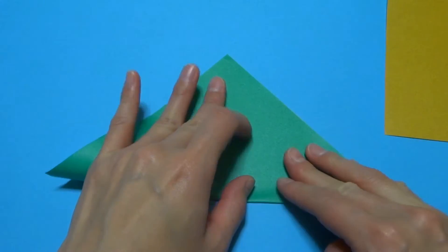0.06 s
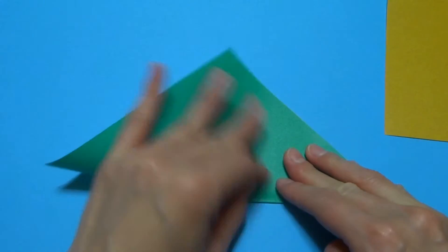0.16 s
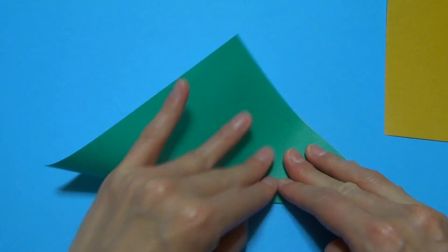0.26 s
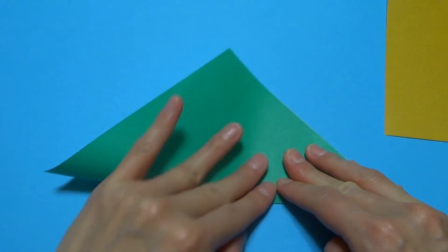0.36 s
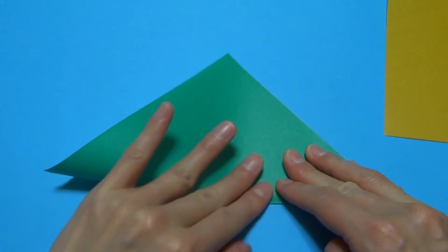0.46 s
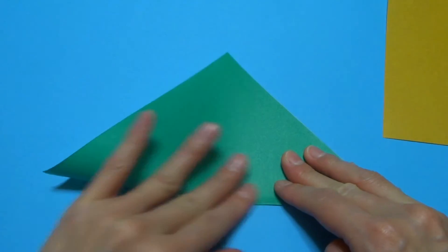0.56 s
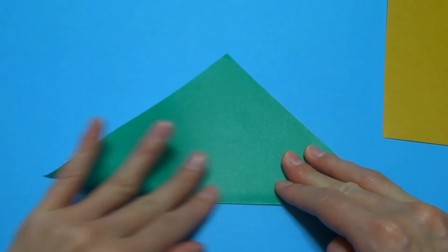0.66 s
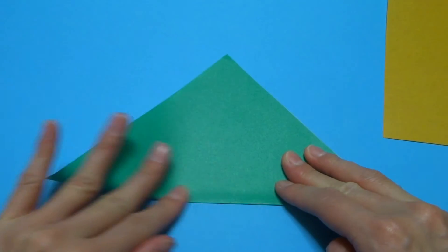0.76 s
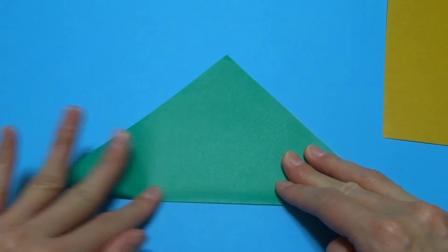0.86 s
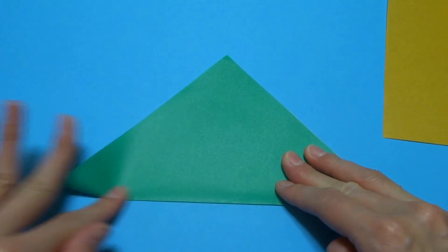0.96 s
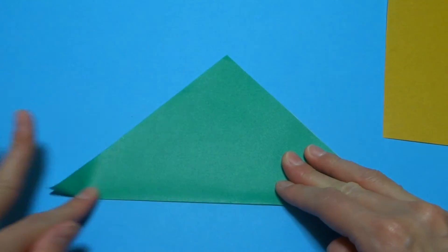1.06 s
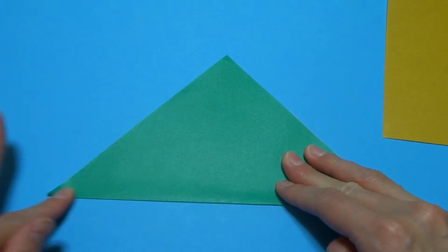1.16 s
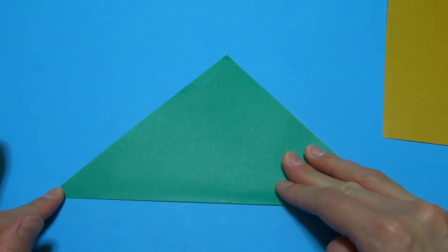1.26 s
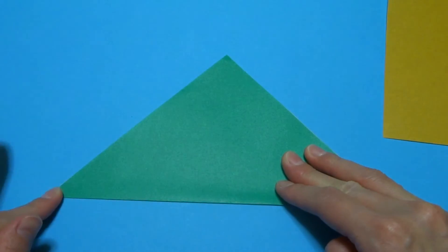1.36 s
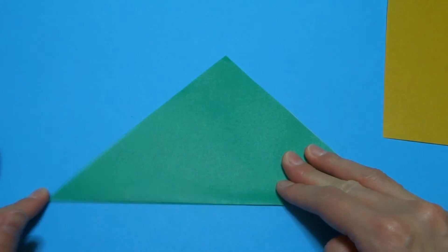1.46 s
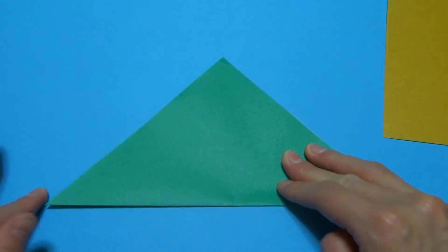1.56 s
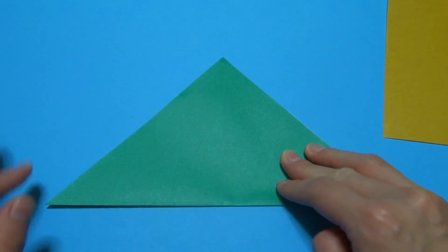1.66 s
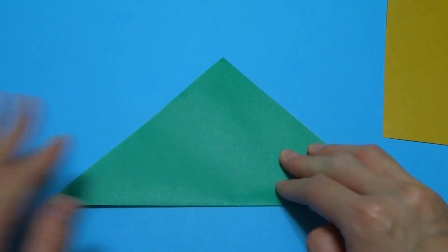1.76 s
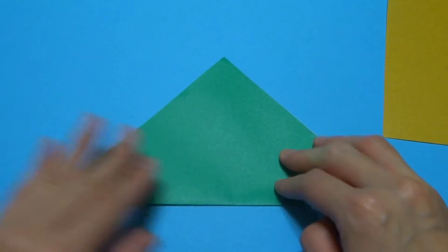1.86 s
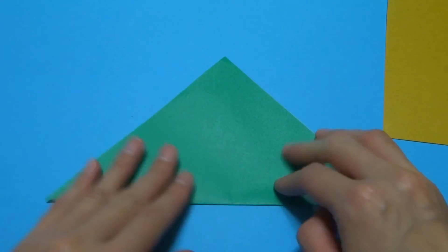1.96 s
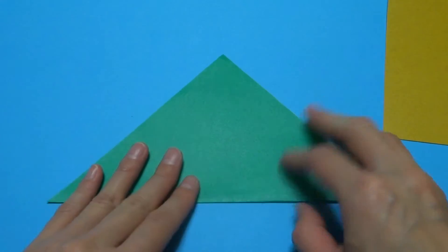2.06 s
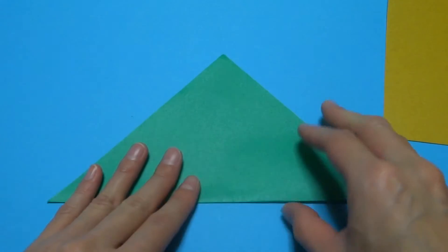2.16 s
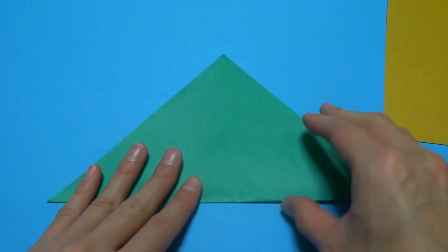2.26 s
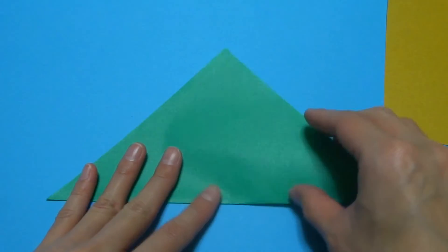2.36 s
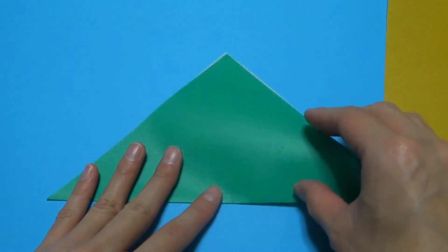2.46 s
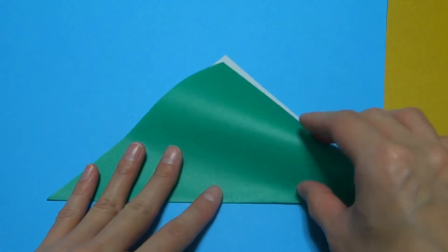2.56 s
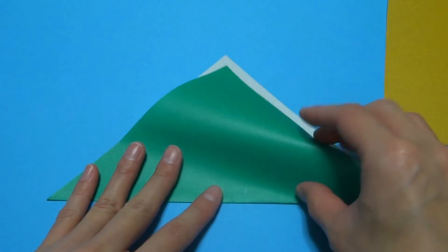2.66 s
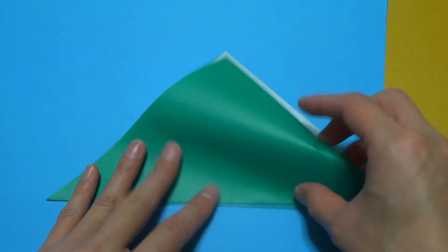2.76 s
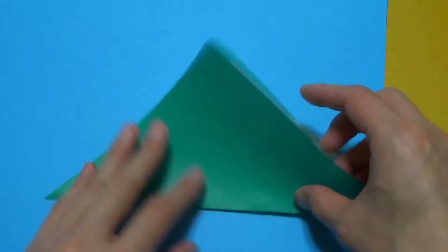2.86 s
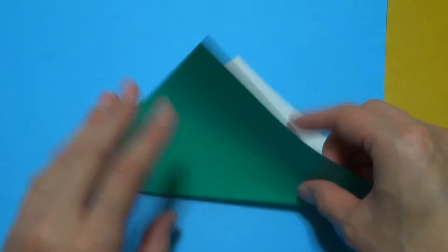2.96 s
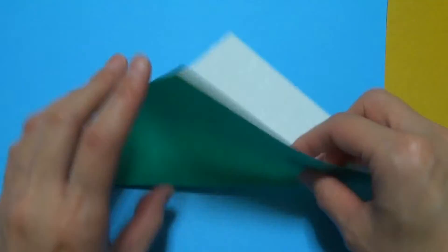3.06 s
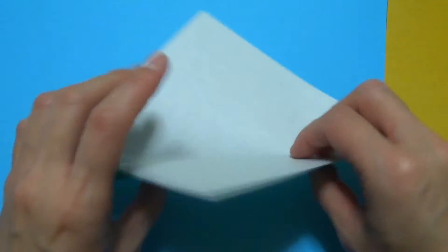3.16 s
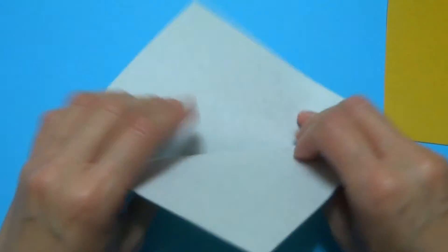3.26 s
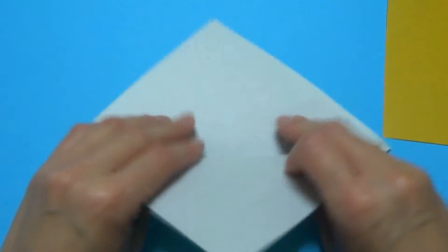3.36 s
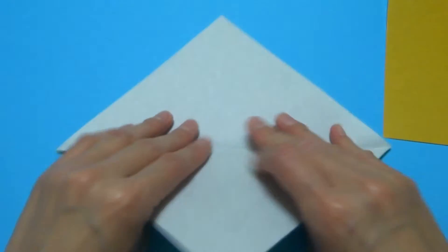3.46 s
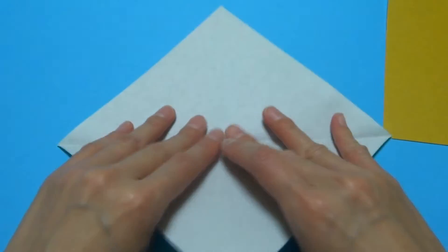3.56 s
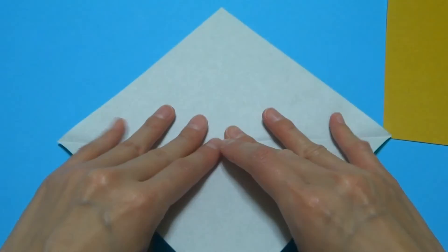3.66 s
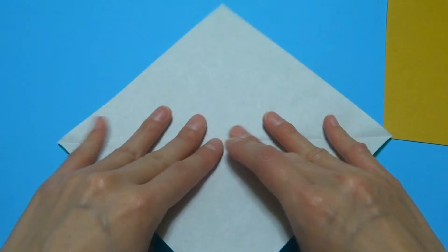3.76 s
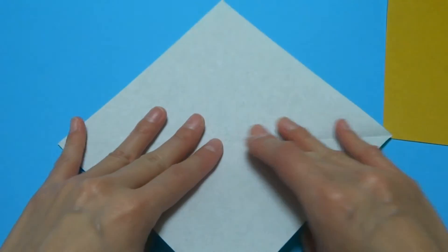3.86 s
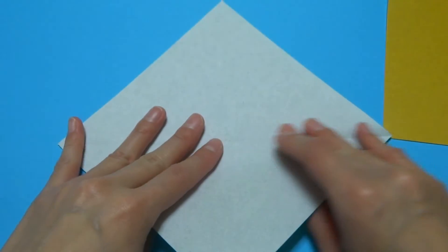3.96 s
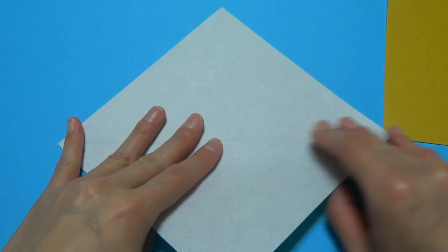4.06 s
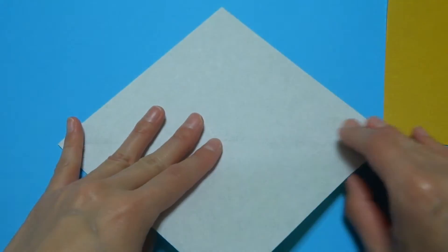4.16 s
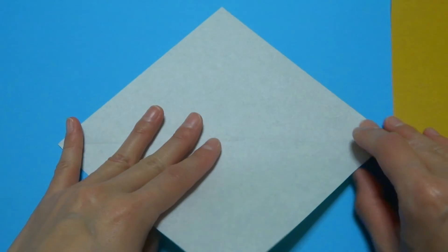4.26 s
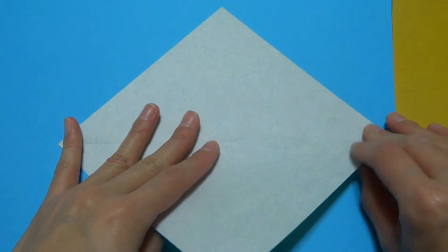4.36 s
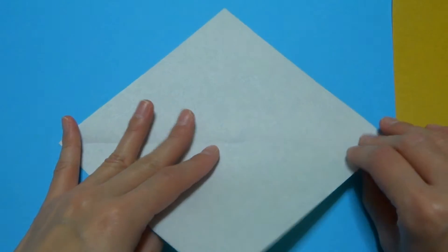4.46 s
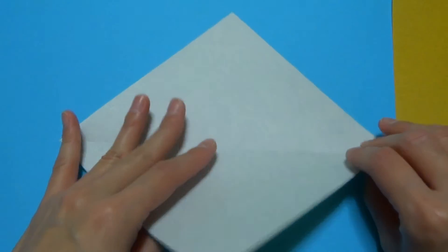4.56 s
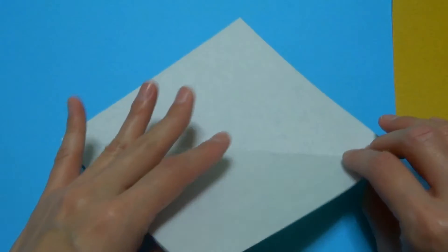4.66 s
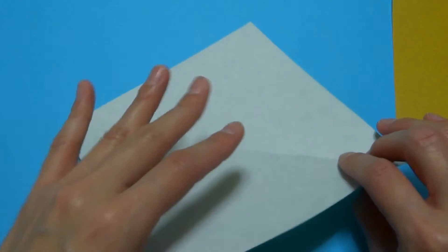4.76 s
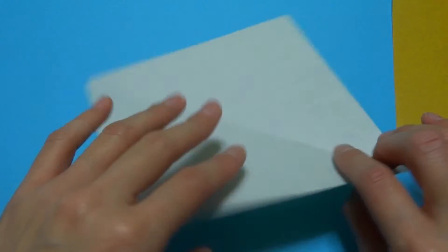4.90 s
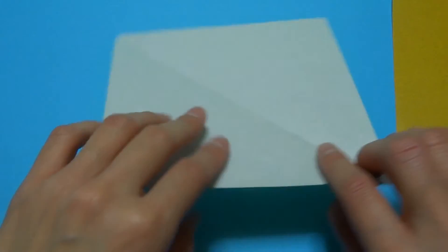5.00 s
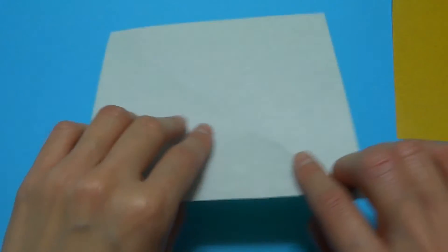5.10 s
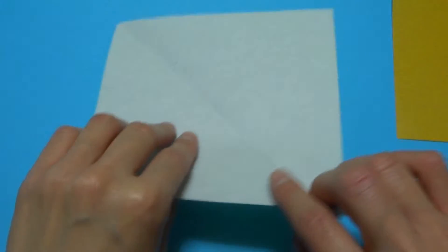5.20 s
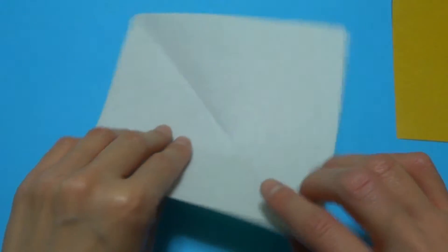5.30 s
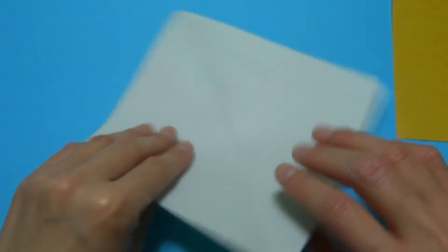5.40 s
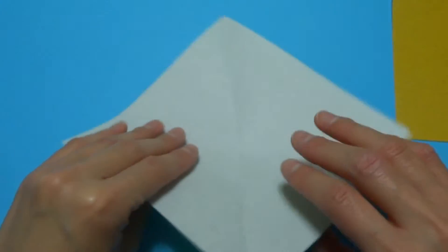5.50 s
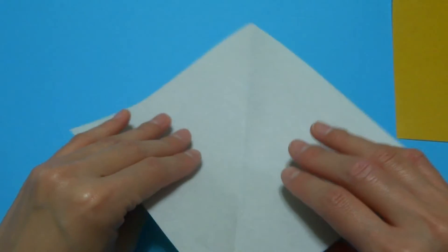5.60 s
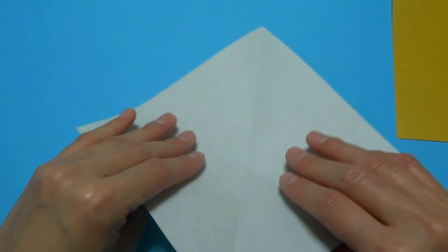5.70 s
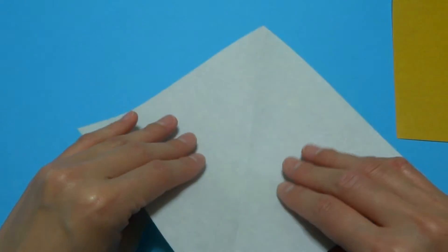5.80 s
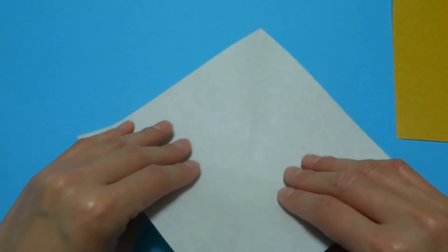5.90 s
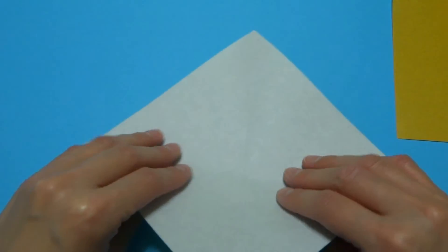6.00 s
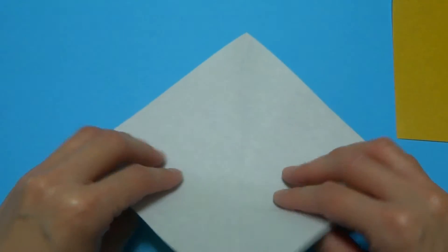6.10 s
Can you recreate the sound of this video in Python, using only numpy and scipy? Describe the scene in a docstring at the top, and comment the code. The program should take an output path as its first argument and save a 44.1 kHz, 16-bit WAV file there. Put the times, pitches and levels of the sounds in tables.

```python
"""A low hum and a faint whirr are there from the start, and a snap of paper comes almost at once.
A folded sheet of thin paper is smoothed, opened and turned on a table in a small room.
Rubbing and hissing are made of thousands of tiny random clicks, shaped in tone and level.
Each snap is a sharp kick with a short flutter of noise; the hands bump the table now and then.
Soft swells of low noise are the air pushed out as the sheet falls."""
import sys
import numpy as np
from scipy import signal
from scipy.fft import rfft, irfft, next_fast_len
from scipy.io import wavfile
from scipy.ndimage import uniform_filter1d, map_coordinates

SR = 44100
rng = np.random.default_rng(int(sys.argv[2]) if len(sys.argv) > 2 else 0)


def store_wav(level_fs):
    """Save 16-bit WAV to argv[1]."""
    pcm = np.round(np.clip(np.atleast_2d(level_fs), -1, 1) * 32767)
    wavfile.write(sys.argv[1], SR, pcm.T.astype(np.int16))


N = 270774  # length of the scene in samples

# tone of the rumble and whirr: pitch_hz, level_db (per Hz)
AMBIENCE_TONE = [(20, 0), (105, -5), (200, -10), (400, -16.5), (700, -20), (920, -14.5), (1030, -7.5),
                 (1190, -7), (1320, -11.5), (1510, -5.5), (1760, -13), (1980, -24), (3500, -30),
                 (11000, -32.5)]
# how alike left and right are in the rumble and whirr: pitch_hz, likeness (1 same, -1 opposite)
AMBIENCE_LIKENESS = [(50, 0.99), (105, 0.71), (190, 0.3), (350, -0.32), (630, -0.56), (1130, -0.49),
                     (2000, 0.055), (4500, 0.063), (9000, 0.57)]
# how alike left and right are in the paper sounds: pitch_hz, likeness (1 same, -1 opposite)
PAPER_LIKENESS = [(200, 0.99), (1000, 0.57), (4000, 0.91), (10000, 0.96)]
# how long the room takes to fade by 60 dB: pitch_hz, fade_s
ROOM_FADE = [(200, 0.51), (1200, 0.13), (5000, 0.11), (11000, 0.07)]
# early echoes from near walls, before a random change of delay: delay_s, level_db
WALL_ECHOES = [(.0032, -11.5), (0.011, -18), (0.0167, -19), (0.018, -27), (0.023, -19)]
# soft blows on the table: start_s, peak_db (before a small random change), contacts, gap_s
TABLE_BUMPS = [(0.308, -38, 3, 0.00393), (1.376, -34, 5, .009), (3.656, -36, 2, 0.015)]
# tone of the table when struck: pitch_hz, level_db (per Hz)
TABLE_TONE = [(40, -41), (85, 5), (125, -3), (190, -0.5), (290, -14.5), (500, -13), (660, -23.5), (930, -6),
              (1100, -17.5), (1500, -23.5), (3000, -33.5), (8000, -45)]
# the sheet falls and pushes air out from under it: middle_s, level_db, half_length_s
AIR_PUFFS = [(3.433, -53, 0.041), (3.54, -48.5, 0.055), (5.603, -47.5, 0.052)]
# tone of that air: pitch_hz, level_db (per Hz)
PUFF_TONE = [(25, -20), (55, -8), (75, 1), (110, -18), (300, -53), (900, -90)]
# brushes, short or drawn out, that catch one resonance of the sheet:
# middle_s, half_length_s, pitch_hz, level_db
PAPER_BRUSHES = [(0.227, 0.05, 6100, -48.5), (0.759, 0.17, 2900, -55.5), (0.97, 0.035, 4570, -47),
                 (3.367, 0.0085, 1130, -40), (3.502, 0.022, 1370, -36.5), (3.505, .03, 4740, -36.5),
                 (4.075, 0.29, 4030, -59), (4.25, 0.022, 7240, -45), (5.398, 0.13, 9900, -43),
                 (6.11, 0.066, 4800, -47.5)]
# the whole sheet bends while it is opened: middle_s, level_db, half_length_s
SHEET_BENDS = [(3.0, -48.5, 0.12), (3.275, -43, 0.044), (3.4, -51.5, 0.12), (3.505, -45, 0.031),
               (3.615, -37, 0.016)]
# tone of the bending: pitch_hz, level_db (per Hz)
BEND_TONE = [(60, -11), (160, -13.5), (300, -13.5), (680, -11.5), (950, -3), (1250, 1), (1700, -12.5),
             (2300, -13.5), (5000, -27)]
# tone of the small pops: pitch_hz, level_db (per Hz)
CRACKLE_TONE = [(600, -15), (1100, -6), (2500, -14), (4500, 4), (7500, 28), (11000, -24)]
# how unevenly the paper sticks and slips: time_s, depth_db
GRIP_DEPTH = [(0, 5), (.5, -0.4), (2.4, 5), (2.7, 2.5), (3.7, 3), (3.9, 0.6), (4.7, 0.15), (4.98, 2.5),
              (5.3, 3)]
# tone of the mid rub: pitch_hz, level_db (per Hz)
RUB_TONE = [(200, -12.5), (650, -13), (950, 0.5), (1500, 0), (2300, -3.5), (3200, -0.5), (4400, -1.5),
            (6000, -4.5), (11000, -9)]
# tone of the treble hiss: pitch_hz, level_db (per Hz)
HISS_TONE = [(600, -30), (2000, -9.5), (4000, -6), (5500, -2), (6500, 0.5), (8000, 4), (9500, 0),
             (11000, -3.5)]
# long slides, one curve each: the left hand wipes along the fold, the hands spread over the
# open sheet, the sheet is turned in two pulls: time_s, rub_db, hiss_db
LONG_SLIDES = [
    [(0.5, -67, -69), (0.59, -50.5, -46.5), (0.676, -52, -41), (0.862, -51, -51.5), (0.958, -54, -43.5),
     (1.116, -64, -53), (1.186, -64, -69), (1.25, -77, -83)],
    [(3.76, -62, -66), (3.796, -58, -52), (3.992, -56.5, -44), (4.174, -52.5, -53.5), (4.222, -60, -63),
     (4.236, -53.5, -49.5), (4.348, -56, -70), (4.43, -58.5, -59)],
    [(4.79, -55.5, -52), (4.872, -61, -31.5), (4.9, -53, -36.5), (4.95, -58, -34), (4.964, -52, -42),
     (4.972, -56, -38.5), (5.022, -52.5, -41), (5.06, -59, -58)],
    [(5.27, -58, -61), (5.288, -53.5, -36), (5.462, -55, -34), (5.484, -55.5, -40), (5.616, -64, -34),
     (5.65, -62, -51.5), (5.7, -59, -42.5), (5.78, -62.5, -65)],
]
# short strokes of a finger or of paper on paper: start_s, length_s, rub_db, hiss_db
SHORT_STROKES = [(0.105, 0.074, -62.5, -58.5), (0.205, 0.054, -53.5, -43), (0.298, 0.06, -55, -60),
                 (1.472, .02, -63, -53), (1.868, 0.0094, -83, -67.5), (1.983, 0.021, -84, -66),
                 (2.034, 0.012, -81, -55.5), (2.31, 0.012, -84, -60), (2.593, 0.11, -55.5, -59.5),
                 (2.79, 0.019, -52.5, -43.5), (2.878, .11, -46.5, -49), (2.975, 0.01, -48, -34),
                 (3.063, 0.11, -50.5, -51), (3.258, 0.15, -48, -63), (3.405, 0.029, -43, -45),
                 (3.474, 0.043, -37.5, -44.5), (3.547, 0.065, -45.5, -63), (3.657, 0.062, -62, -53),
                 (4.476, 0.045, -62, -45.5), (4.566, 0.073, -52, -44), (4.706, .035, -54.5, -45),
                 (5.135, 0.13, -58, -49.5), (5.207, 0.018, -53, -43.5), (5.285, 0.012, -62, -41),
                 (5.853, .08, -64.5, -53), (5.982, 0.27, -52, -48.5)]
# the paper buckles: start_s, level_db, pitch_hz (of the dent), body_db (low body of the whole sheet),
# fade_s (time for the flutter to fade by 60 dB)
PAPER_SNAPS = [(0.0302, -5, 1690, -2, 0.025), (0.309, -16, 5400, 0, .011), (0.429, -17.5, 2700, 1, .014),
               (1.3733, -11.5, 2280, -2, 0.011), (2.3798, -13, 2060, 1, 0.017),
               (2.4297, -17, 7500, 0, 0.0098), (2.5581, 0, 5970, 0.5, 0.016),
               (2.8112, -11, 4400, -3, 0.023), (2.8577, 7, 7250, 1, 0.018), (2.8823, 9.5, 5150, -3, 0.022),
               (2.904, 1.5, 4000, 3, 0.011), (3.0063, -4, 5580, 3, .009), (3.0643, -3, 3580, 3, .017),
               (3.2311, 3, 6560, 1, 0.013), (3.2881, 2, 2400, -1, .018), (3.4024, 14.5, 2380, -4, .008),
               (3.43, 7.5, 3220, 5, 0.017), (3.5883, 5, 7600, -1, 0.0034), (3.601, 4.5, 3200, 3, 0.041),
               (3.64, -4, 1310, 2, 0.01), (3.6688, 3, 2200, 4, 0.0045), (3.6917, 3, 2820, -3.5, 0.012),
               (3.7158, 1.5, 1390, 2.5, 0.0059), (3.861, -11, 3760, 4, 0.018),
               (4.3193, -18, 5500, -8, .009), (4.5849, 2.5, 8900, -9, 0.003),
               (4.7572, -10, 2670, -1, 0.015), (4.87, -12, 9000, -14, 0.017),
               (4.9226, -8, 9900, -16, 0.003), (5.073, 0, 2400, 2, 0.005), (5.094, -16, 7200, 8, 0.013),
               (5.1174, -10.5, 1270, 2, .02), (5.231, -10.5, 2980, 3, 0.01), (5.707, -13.5, 4500, 2, 0.018)]
# what the sheet gives out in a snap: pitch_hz, level_db (per Hz)
SNAP_TONE = [(100, -19), (640, -18), (950, 0.5), (1450, 0), (1900, -1.5), (2400, -5), (3200, 0.5),
             (4500, 1.5), (8000, 0), (11000, -1)]

TOP_HZ = 11000  # the sound drops away steeply above this
BRUSH_Q = 5.2  # centre of a brush's resonance over its width
RISE_DB_PER_S, FALL_DB_PER_S = 336, 210  # edges of a very long stroke; shorter ones are steeper
SHORT_S = 0.027  # the edges of a stroke this short are twice as steep
DENT_PEAK_DB, DENT_OCTAVES, DENT_FALL_DB_PER_OCTAVE = 2.5, 0.21, 10  # a dent gives little above its pitch
BODY_HZ = 1860  # the whole sheet sounds below this


def amp(db):
    """Turn decibels into a gain."""
    return 10 ** (np.asarray(db) / 20)


def unit(x):
    """Scale x to an average (rms) level of 1."""
    return x / np.sqrt(np.mean(x ** 2) + 1e-20)


def along(points, hz):
    """Read a curve of (Hz, value) points, spaced by the logarithm of pitch."""
    f, v = np.transpose(points)
    return np.interp(np.log(hz + 1), np.log(f + 1), v)


def curves(rows):
    """Give one value per sample for each column after the time."""
    s, *columns = np.transpose(rows)
    t = np.arange(N) / SR
    return [np.interp(t, s, column) for column in columns]


def wobble(rate):
    """Draw a smooth random curve with this many knots a second."""
    knots = rng.standard_normal(int(N * rate / SR) + 4)
    return map_coordinates(knots, [np.arange(N) * rate / SR])


def swells(rows):
    """Sum bell-shaped swells into one gain over time."""
    t = np.arange(N) / SR
    return sum(amp(db) * np.exp(-((t - s) / half) ** 2) for s, db, half in rows)


def filtered(x, response):
    """Multiply the spectrum of x by a gain for each pitch."""
    m = next_fast_len(N + SR // 2)
    return irfft(rfft(x, m) * response(np.fft.rfftfreq(m, 1 / SR)), m)[..., :N]


def add(track, s, sound):
    """Mix a sound into the track at time s."""
    part = track[..., max(round(s * SR), 0):][..., :sound.shape[-1]]
    part += sound[..., :part.shape[-1]]


def coloured(pair, tone, likeness):
    """Turn two unrelated signals into a stereo sound of rms 1 with this tone and likeness."""
    def middle_and_side(hz):
        turn = np.arccos(np.clip(along(likeness, hz), -1, 1)) / 2
        return amp(along(tone, hz)) * np.array([np.cos(turn), np.sin(turn)])
    mid, side = filtered(pair, middle_and_side)
    return unit(np.array([mid + side, mid - side]))


def impulse(tone, size=2048):
    """Build a click with this tone whose energy comes as early as possible."""
    cepstrum = irfft(np.log(amp(along(tone, np.fft.rfftfreq(size, 1 / SR)))))
    # fold the second half onto the first, so nothing sounds before the click
    cepstrum[1:size // 2] *= 2
    cepstrum[size // 2 + 1:] = 0
    return irfft(np.exp(rfft(cepstrum)))


def slips(rate, spread_db):
    """Make tiny catches of the fibres: random clicks, about rate a second, of unequal size."""
    sizes = amp(spread_db * np.clip(rng.standard_normal(N), -2, 2))
    happens = rng.random(N) < rate / SR
    return rng.standard_normal((2, N)) * sizes * happens


def shifting(x, depth_db):
    """Let the sheet's broad resonances drift as its shape changes, by smooth random gains."""
    z = signal.stft(x, nperseg=512)[2]
    field = rng.standard_normal(z.shape[1:])
    field = uniform_filter1d(field, size=9, axis=0)  # smooth over pitch
    field = uniform_filter1d(field, size=10, axis=1)  # smooth over time
    return signal.istft(z * amp(depth_db * unit(field)), nperseg=512)[1][:, :N]


def gate(start, end):
    """Shape a stroke: it swells quickly, holds and dies away more slowly; short ones have quicker edges."""
    t = np.arange(N) / SR
    edge_db = np.minimum(RISE_DB_PER_S * (t - start), FALL_DB_PER_S * (end - t))
    steeper = 1 + SHORT_S / max(end - start, 1e-3)
    return amp(np.clip(edge_db * steeper, -120, 0))


def background():
    """Room rumble and a steady whirr from noise, with a faint whine and a wavering hum from sines."""
    t = np.arange(N) / SR

    # the whirr is partly out of step between left and right, so it spreads wider than the rumble
    def middle_and_side(hz):
        width = np.tan(np.arccos(np.clip(along(AMBIENCE_LIKENESS, hz), -.8, 1)) / 2)
        return amp(along(AMBIENCE_TONE, hz)) * np.array([np.ones_like(hz), width])
    mid, side = filtered(rng.standard_normal((2, N)), middle_and_side)
    air = amp(-54.0) * np.array([mid + side, mid - side]) / mid.std()

    waver = amp(0.5 * wobble(23))
    hum = amp(-60.0) * waver * np.sin(2 * np.pi * 105 * t + 1.4 * wobble(22))
    whine_gain = amp(-61 + 2.0 * wobble(8.4))
    whine = whine_gain * np.sin(2 * np.pi * 1215 * t + 1.8 * wobble(70))
    return air + hum + whine


def room(x, tail_db, echo_db):
    """Add echoes from near walls, redrawn at each call as places vary, and a short tail of fading noise."""
    hz, t, z = signal.stft(rng.standard_normal((2, SR // 4)), SR, nperseg=256)
    fade = amp(-60 * t / along(ROOM_FADE, hz)[:, None])
    mid, side = signal.istft(z * fade, SR, nperseg=256)[1]
    tail = np.array([mid + 0.23 * side, mid - 0.41 * side]) / np.linalg.norm(mid)
    answer = np.zeros((2, SR // 4))
    answer[:, 0] = 1  # the direct sound
    add(answer, .008, amp(tail_db) * tail)
    for delay, db in WALL_ECHOES:
        add(answer, delay * rng.uniform(.9, 1.2), amp(db + echo_db) * np.ones(1))
    return signal.fftconvolve(x[None], answer, axes=1)[:, :N]


def bumps():
    """A hand lands on the table and chatters against the top, a few dull contacts in a row."""
    track, thud = np.zeros(N), impulse(TABLE_TONE)
    thud = thud / np.abs(thud).max()
    for s, db, contacts, gap in TABLE_BUMPS:
        for k in range(round(contacts)):
            contact_s = s + gap * (k + rng.uniform(0, .12))
            add(track, contact_s, amp(db + rng.normal(0, 1)) * thud)
    return room(track, tail_db=-15, echo_db=-6)


def puffs():
    """The sheet settles on a cushion of air, heard as swells of low noise."""
    return swells(AIR_PUFFS) * coloured(rng.standard_normal((2, N)), PUFF_TONE, PAPER_LIKENESS)


def brushing():
    """A fingertip or a corner of the sheet swishes past: noise coloured by one resonance."""
    track = np.zeros(N)
    t = np.arange(-SR // 3, SR // 3) / SR
    noise_hz = np.fft.rfftfreq(len(t), 1 / SR)
    for s, half, hz, db in PAPER_BRUSHES:
        resonance = 1 / (1 + (2 * BRUSH_Q * (noise_hz / hz - 1)) ** 2)
        swish = unit(irfft(rfft(rng.standard_normal(len(t))) * resonance, len(t)))
        swish = amp(db) * swish * np.exp(-(t / half) ** 2)
        add(track, s + t[0], swish[s + t >= 0])  # leave out what falls before the start
    return track


def flexing():
    """The bending sheet gives a lower, coarser crackle of fewer clicks."""
    grain = shifting(slips(1100, 4), depth_db=3.5)
    return swells(SHEET_BENDS) * coloured(grain, BEND_TONE, PAPER_LIKENESS)


def crinkling(rub_gain, hiss_gain):
    """Many small dents pop in quick succession while the sheet is being moved."""
    handled = np.interp(np.arange(N) / SR, [2.6, 2.8, 5.0, 5.3], [0, 1, 1, 0])
    pops = coloured(shifting(slips(90, 1.7), depth_db=2), CRACKLE_TONE, PAPER_LIKENESS)
    return handled * np.sqrt(rub_gain * hiss_gain) * amp(-15.0) * pops


def friction():
    """Give the gains of rub and hiss over time, adding the power of all slides and strokes."""
    power = np.zeros((2, N))
    for slide in LONG_SLIDES:
        power += (amp(curves(slide)) * gate(slide[0][0], slide[-1][0])) ** 2
    for start, length, rub_db, hiss_db in SHORT_STROKES:
        power += (amp([[rub_db], [hiss_db]]) * gate(start, start + length)) ** 2
    return np.sqrt(power)


def sliding(rub_gain, hiss_gain):
    """Skin rubs on paper and paper hisses on the table; both share the unevenness of the stroke."""
    grip_db = curves(GRIP_DEPTH)[0] * wobble(85)
    rub_grain = shifting(slips(13000, 3), depth_db=1.8)
    hiss_grain = shifting(slips(18000, 2), depth_db=1.4)
    rub = rub_gain * amp(grip_db + 4.0) * coloured(rub_grain, RUB_TONE, PAPER_LIKENESS)
    hiss = hiss_gain * amp(grip_db) * coloured(hiss_grain, HISS_TONE, PAPER_LIKENESS)
    return rub + hiss


def dent(pitch_hz, body_db):
    """Give the tone of one buckle: the sheet's body, a peak at the dent's pitch and a slope above it."""
    hz = np.geomspace(100, SR / 2, 64)
    octaves = np.log2(hz / pitch_hz)
    peak_db = DENT_PEAK_DB * np.exp(-(octaves / DENT_OCTAVES) ** 2)
    slope_db = DENT_FALL_DB_PER_OCTAVE * np.maximum(octaves, 0)
    low_share = 1 / (1 + (hz / BODY_HZ) ** 4)
    return np.column_stack([hz, along(SNAP_TONE, hz) + peak_db - slope_db + body_db * low_share])


def snapping():
    """Each buckle is a sharp kick and a brief flutter; the small sheet radiates little bass."""
    track, t = np.zeros((2, N)), np.arange(SR // 16) / SR
    for s, db, pitch_hz, body_db, fade_s in PAPER_SNAPS:
        flutter = unit(rng.standard_normal(len(t))) * amp(-60 * t / fade_s)
        flutter[0] += 2.5  # the kick
        # the kick and its flutter hold about the same energy at every pitch
        z = rfft(flutter)
        flutter = irfft(z / np.sqrt(uniform_filter1d(np.abs(z) ** 2, size=60)))
        snap = signal.fftconvolve(flutter, impulse(dent(pitch_hz, body_db)))
        snap = amp(db) * snap[:len(t) // 2]
        # each snap starts a hair (0.7 ms) after its listed time
        add(track, s + .0007, room(snap, tail_db=-7.5, echo_db=-1.5))
    return track


def scene():
    """Put paper and table together in the room, over the background."""
    rub_gain, hiss_gain = friction()
    rustle = sliding(rub_gain, hiss_gain) + flexing() + crinkling(rub_gain, hiss_gain) + brushing()
    # the room answers the middle of the rustle; its left-right difference stays dry
    middle = rustle.mean(axis=0)
    rustle_in_room = room(middle, tail_db=-10.5, echo_db=-13.5) + rustle - middle
    return snapping() + bumps() + amp(1.23) * rustle_in_room + puffs() + background()


def record(dry):
    """Cut the top: the level falls 1 dB for every 12 Hz above TOP_HZ, down to -120 dB."""
    return filtered(dry, lambda hz: amp(-np.clip((hz - TOP_HZ) / 12, 0, 120)))


dry = scene()
out = record(dry)
store_wav(out)
```